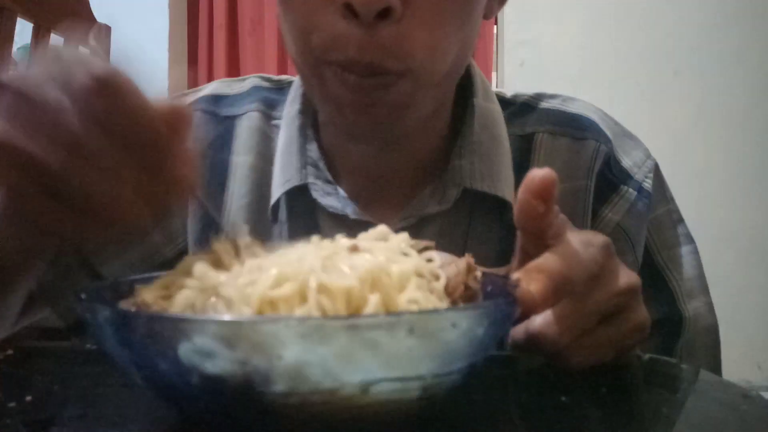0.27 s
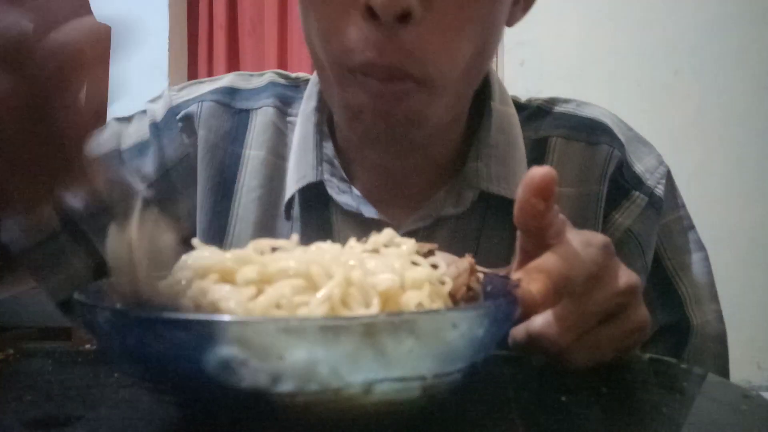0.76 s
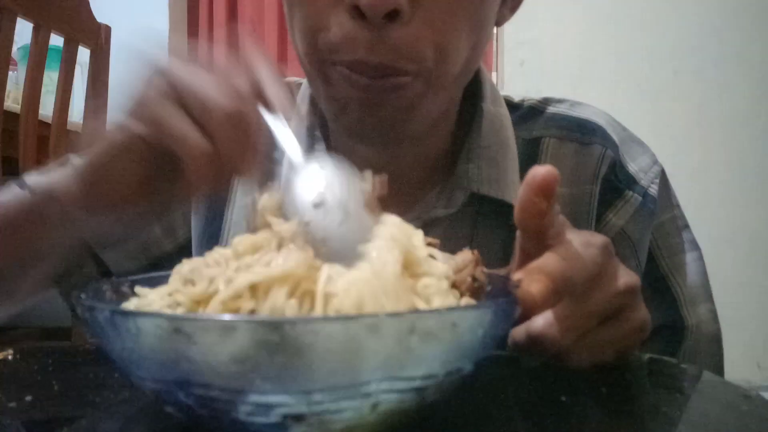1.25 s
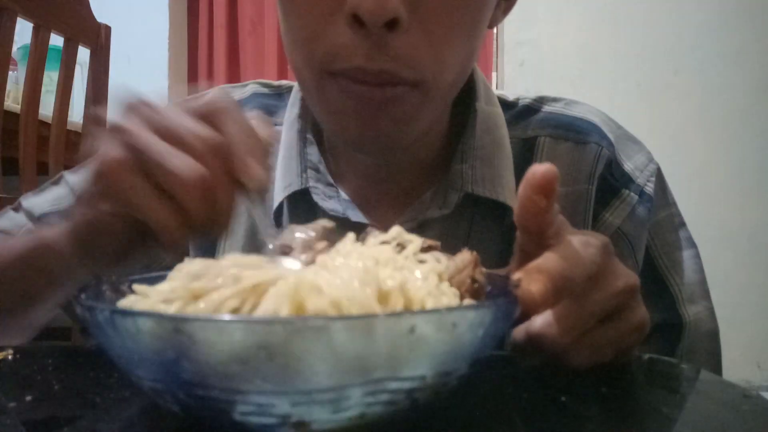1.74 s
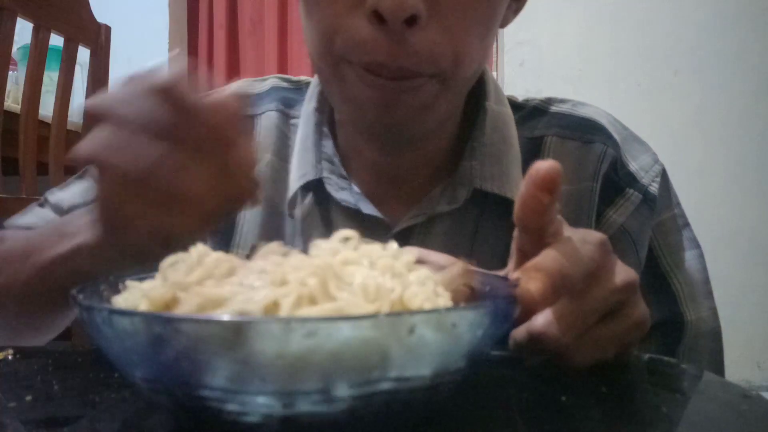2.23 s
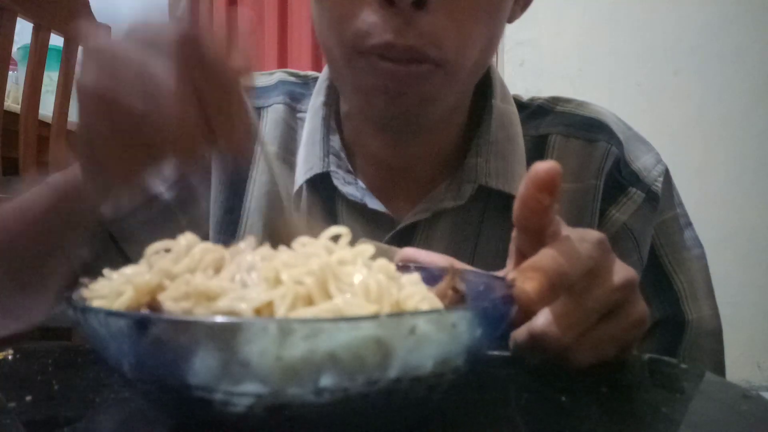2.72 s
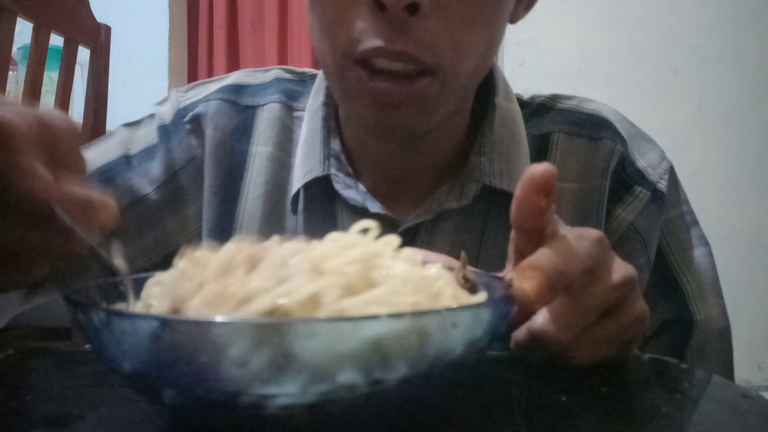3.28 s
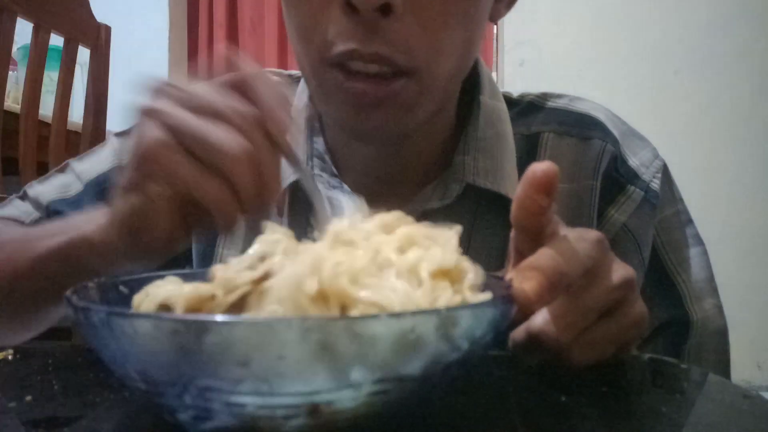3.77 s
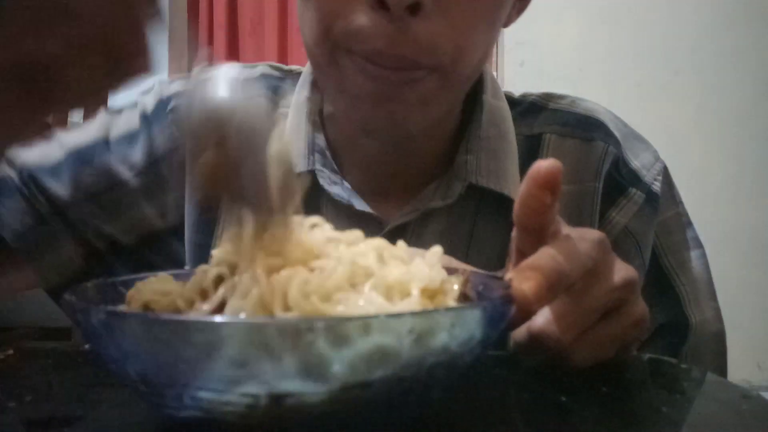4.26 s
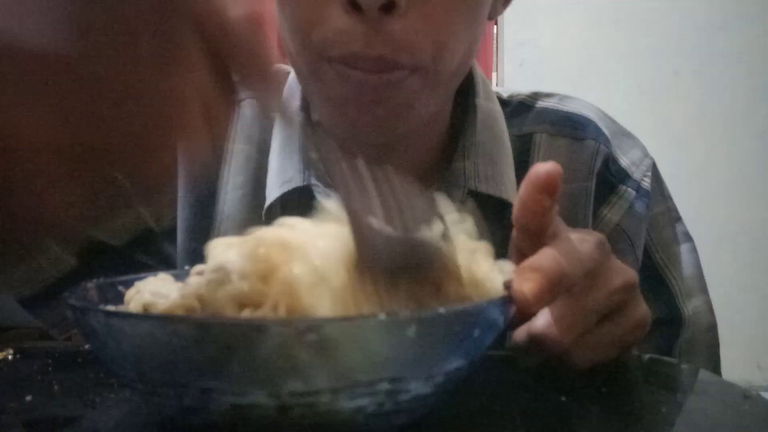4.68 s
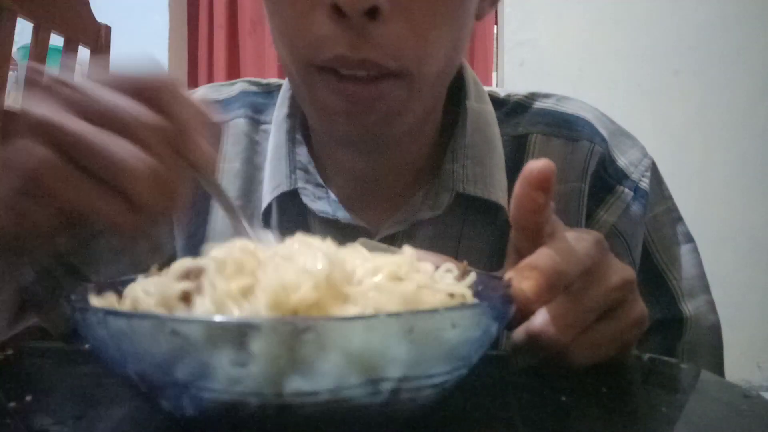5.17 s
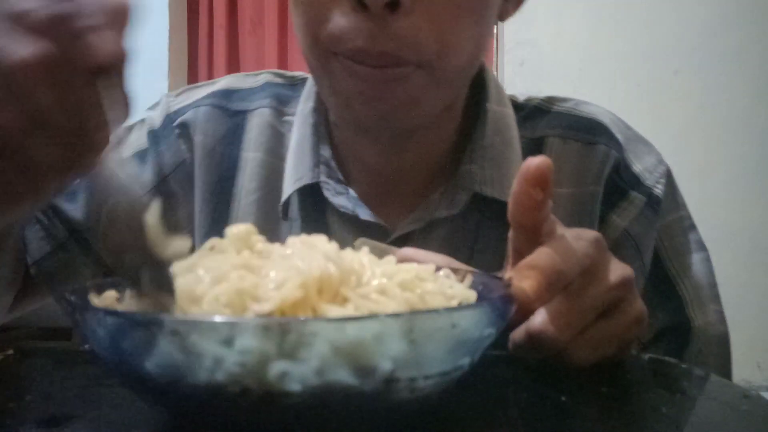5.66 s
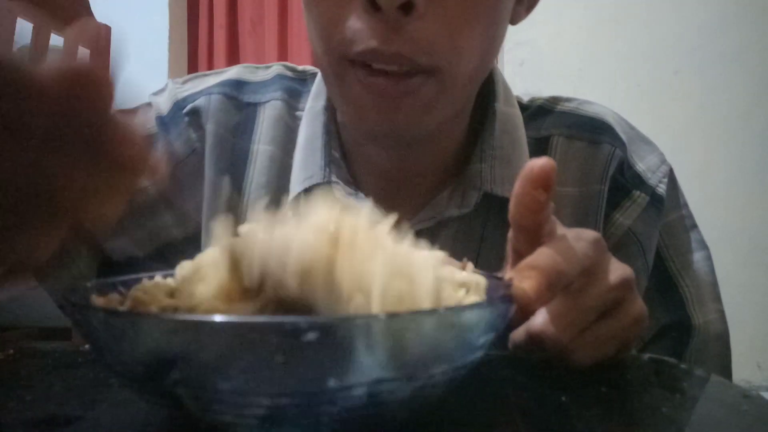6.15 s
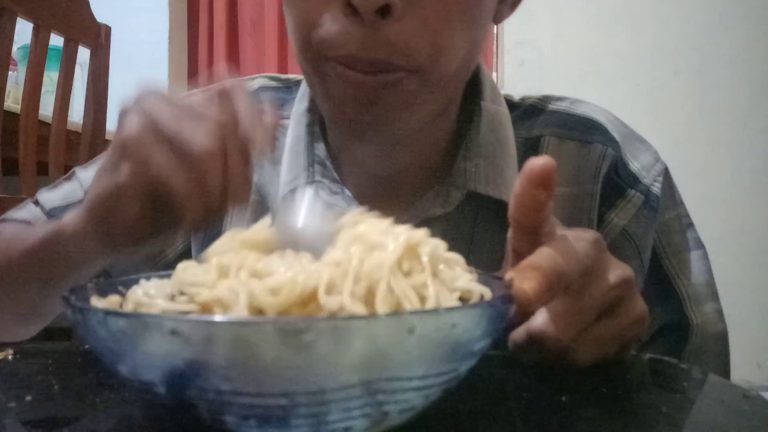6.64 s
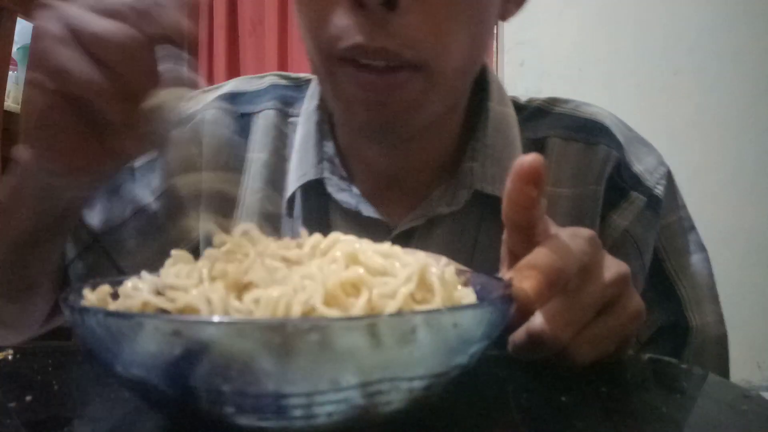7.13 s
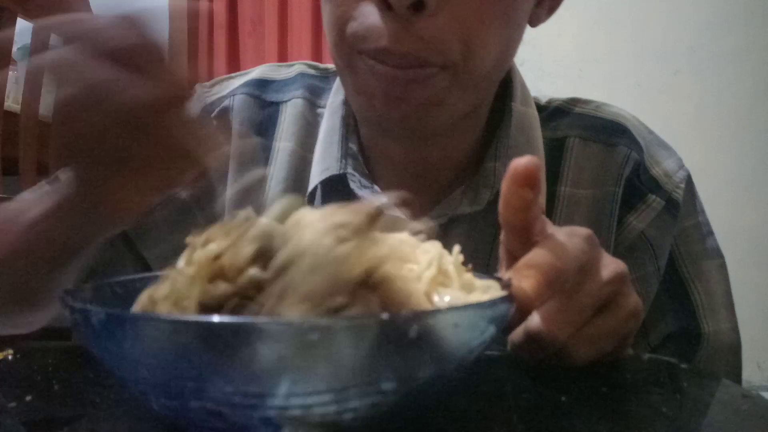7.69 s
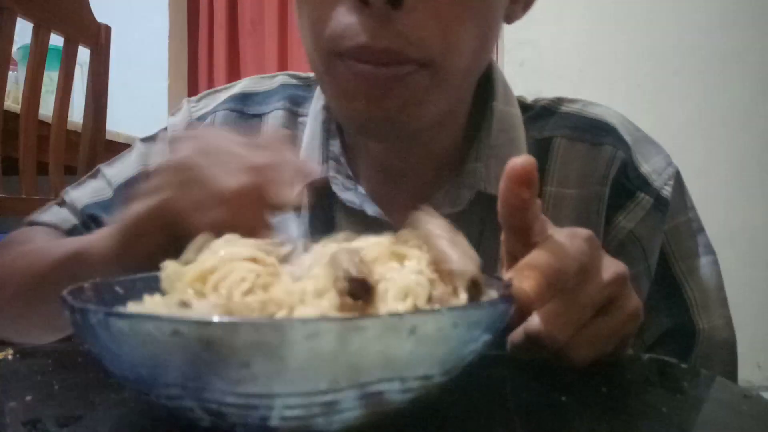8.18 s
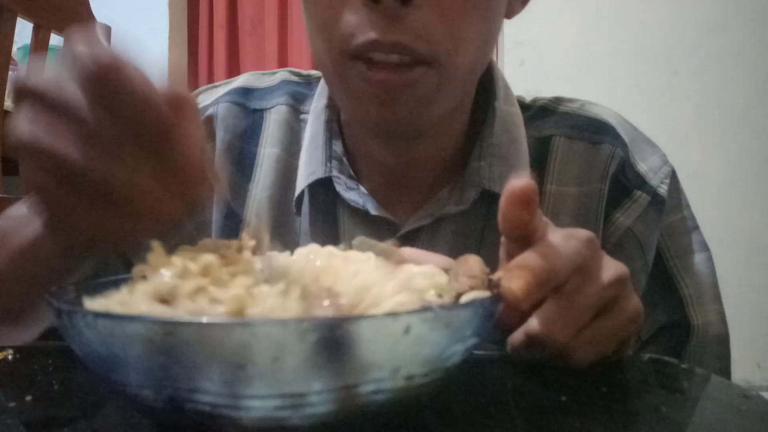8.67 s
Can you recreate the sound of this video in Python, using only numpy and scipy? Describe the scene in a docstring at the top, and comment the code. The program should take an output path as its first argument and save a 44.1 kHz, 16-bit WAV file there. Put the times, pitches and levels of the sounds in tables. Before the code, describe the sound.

A close metal spoon stirs wet noodles in a glass bowl on a table, in a bare, slightly echoing room at night. A bright clink with a low table boom opens the sound; hollow plops follow at 0.3, then a small cluster of clinks at 0.7 and a dull bowl knock at 0.9. Wet plops and rubbing around 1.4 lead to a sharp clink at 1.7. Another dull knock falls at 2.1. At 3.1 a hard clink and quick rasp start a rustling slide that ends in a strong ringing clink at 3.8. Another loud clink comes at 5.2, lighter taps around 6, a clear hit at 6.8, then a bright juddering clatter at 7.3. A clink at 8.2 and wet plops at 8.6 close it. Cricket chirps come in quick groups, mostly from 1 second on, pausing around 4, over a constant faint shrill insect chorus.

```python
"""A metal spoon stirs noodles in a glass bowl on a table, in a bare room at night. Blows ring the glass as
short fading tones with a rough crack, and boom in the table and room. Rubbing, rasping and sliding are tiny
random slips or noise shaped by the bowl; wet noodles plop and tick. Crickets sing as short falling whistles
over a blurred trill, a shrill insect chorus and a quiet background."""
import sys
import numpy as np
from scipy import signal
from scipy.fft import rfft, irfft, next_fast_len
from scipy.io import wavfile
from scipy.ndimage import uniform_filter1d

SR = 44100
rng = np.random.default_rng(int(sys.argv[2]) if len(sys.argv) > 2 else 0)


def transcribe(signal):
    """Save signal, clipped to [-1, 1], as a 16-bit WAV file at the path in sys.argv[1]."""
    frames = np.atleast_2d(signal).T
    limited = np.clip(frames, -1, 1)
    pcm = np.round(limited * 32767).astype(np.int16)
    wavfile.write(sys.argv[1], SR, pcm)


N = 393283
TIME = np.arange(N) / SR
TOP_HZ = 16400


def undb(db):
    """Turn decibels into gain."""
    return 10 ** (np.asarray(db) / 20)


def unit(x):
    """Scale to rms 1."""
    return x / np.sqrt(np.mean(x ** 2))


def held(x, seconds):
    """Scale to the energy of a sound of rms 1 that lasts this long."""
    return x * np.sqrt(seconds * SR / np.sum(x ** 2))


def clock(seconds):
    """Sample times of a short sound."""
    return np.arange(int(seconds * SR)) / SR


def fade(t, t60):
    """Die away smoothly, by 60 dB in t60 seconds."""
    return np.exp(-np.log(1000) * t / t60)


def band(x, lo_hz, hi_hz, order=3):
    """Keep only the pitches between two edges."""
    edges = [lo_hz, min(hi_hz, SR / 2 - 1)]
    return signal.sosfilt(signal.butter(order, edges, "band", fs=SR, output="sos"), x)


def resonate(x, peaks):
    """Side-by-side resonances (f/Hz, half-width of one pass/Hz, level/dB), passed twice for dark valleys."""
    out = 0
    for hz, half_width, db in peaks:
        b, a = signal.iirpeak(hz, hz / (2 * half_width), fs=SR)
        once = signal.lfilter(b, a, x)
        out = out + undb(db) * signal.lfilter(b, a, once)
    return out


def coloured(points):
    """Noise that follows a spectrum of (f/Hz, level/dB per Hz)."""
    hz, db = np.transpose(points)
    size = next_fast_len(N)
    log_hz = np.log(np.fft.rfftfreq(size, 1 / SR) + 1)
    gain = undb(np.interp(log_hz, np.log(hz), db))
    return irfft(rfft(rng.standard_normal(size)) * gain, size)[:N] * np.sqrt(SR / 2)


def walk(rate):
    """Smooth random wander of rms 1, with this many new values a second."""
    k = int(SR / rate)
    steps = np.repeat(rng.standard_normal(N // k + 1), k)
    return unit(uniform_filter1d(steps, k)[:N])


def grains(rate, spread_db):
    """Random tiny clicks, a few much larger than the rest."""
    size = undb(spread_db * np.minimum(rng.exponential(size=N), 5))
    return (rng.random(N) < rate / SR) * size * rng.standard_normal(N)


def waver(x, depth, rate):
    """Bend the pitch of a sound at random."""
    place = np.cumsum(np.exp(depth * walk(rate))) % (N - 1)
    return np.interp(place, np.arange(N), x)


def add(out, s, x):
    """Mix x in at time s."""
    i = min(max(int(s * SR), 0), N)
    out[i:i + len(x)] += x[:N - i]


# quiet background, with a faint hiss up high: f/Hz, level/dB per Hz
QUIET = [(25, -112), (60, -102), (130, -96), (320, -96.5), (500, -105), (1000, -107), (1600, -113),
         (2700, -115), (3450, -108), (4100, -111), (4800, -107), (5600, -110), (7800, -114), (8600, -125),
         (13500, -128), (15200, -119)]
# distant insect chorus: f/Hz, level/dB per Hz before it wanders
CHORUS = [(5700, -125), (6100, -105), (6330, -87), (6480, -91), (6630, -87), (6820, -93.5), (7150, -89),
          (7450, -99), (7800, -113), (8300, -135)]


def night(swell_db=0.84, flicker_db=1.03, rumble_db=0.5):
    """A steady shrill of far insects over a quiet background, whose low rumble comes and goes."""
    quiet = coloured(QUIET)
    rumble = signal.sosfiltfilt(signal.butter(2, 350, fs=SR, output="sos"), quiet)
    shrill = coloured(CHORUS) * undb(swell_db * walk(2.03) + flicker_db * walk(60))
    return shrill + quiet - rumble + rumble * undb(rumble_db * walk(9.9))


# edges of the four ranges called knock, body, ring and sheen: f/Hz
RANGES_HZ = [330, 1300, 3700, 7800, 16000]
# the places on the bowl, in the order of the level columns below
SPOTS = ["side", "rim", "bottom"]
# natural tones of spoon and filled bowl: f/Hz, t60/s, relative level/dB struck on side, on rim, on bottom
MODES_BOWL = [(446, 0.056, -18, -1.5, 7.5), (600, 0.071, -11.5, -2, -2.5), (840, 0.19, -19, -14, -31),
              (1001, 0.076, -12, -2.5, -27), (1250, 0.027, -13.5, -16, -33), (1740, 0.036, -26, -11, -50),
              (2200, 0.011, -3.5, -31, -21), (2640, 0.0067, -14, -0.5, -12), (2950, 0.04, -33, -24, -45),
              (3340, 0.037, -43, -3, -23), (3520, 0.013, -8.5, 5, 3.5), (3900, 0.021, -12, -44, -41),
              (4175, 0.053, -8, 2, -12), (4600, 0.04, -32, -14, -30), (4780, 0.017, -9, -16, -2),
              (5170, 0.051, -9, 0.5, -8.5), (5490, 0.024, -4.5, -19, -36), (5700, 0.031, -22, 4.5, 3),
              (6030, 0.012, -12.5, -15, -14.5), (6220, 0.036, -66, -21, 1), (6440, 0.024, -12, -12, -16),
              (6670, 0.036, 0, -4.5, -12.5), (7460, 0.074, -12, -30, -30), (7070, 0.02, -40, 4, -32),
              (8200, 0.019, -32, -42, -47), (8310, 0.016, -33, -47, -50), (9000, 0.016, -47, -26, -21),
              (9700, 0.021, -34, -29, -50), (10680, 0.042, -43, -44, -59), (11900, 0.037, -37.5, -40, -41),
              (13900, 0.025, -56, -30, -47), (15300, 0.043, -40, -36, -38)]
# ways to strike: spot on the bowl, then the lead over the bowl's strongest tone in the same range of
# the knock (level/dB), the first ring (level/dB) and the second ring (level/dB)
TOUCHES = {"side": ("side", 3.5, 1.5, -0.61), "tip": ("side", 1.6, 10.3, 4.3),
           "rim": ("rim", 4.6, 1.9, 1.7), "bottom": ("bottom", 7.7, 8.6, 1.7)}


def bowl_modes(touch, knock_hz, rings_hz, knock_t60=0.09, ring_t60=0.03):
    """The spot struck sets the bowl's tones; the held spoon adds a knock and two rings that shift with grip."""
    spot, knock_db, *rings_db = TOUCHES[touch]
    hz, t60, *by_spot = np.transpose(MODES_BOWL)
    db = by_spot[SPOTS.index(spot)]

    def strongest(near_hz):
        """Loudest bowl tone in the same range."""
        return db[np.digitize(hz, RANGES_HZ) == np.digitize(near_hz, RANGES_HZ)].max()

    knock = (knock_hz, strongest(knock_hz) + knock_db, knock_t60)
    rings = [(f, strongest(f) + lead_db, ring_t60) for f, lead_db in zip(rings_hz, rings_db)]
    return [*zip(hz, db, t60), knock, *rings]


# crack of the contact against the tones, one for each range: level/dB before crack_db is added
CRACK_DB = [-10.5, -2.5, -16.5, -5]


def clink(modes, levels_db, crack_db, hold_s=0.0065, smear=0.13):
    """Each clink, fading tones and a crack, holds for a few milliseconds, then drops quickly, more so when loud."""
    drop_db, drop_s = -14, 0.0044
    attack_s, soft_attack_s = 0.00049, 0.0026
    detune, scatter_db = 0.0045, 2.5  # small chance changes from blow to blow
    t = clock(.06)
    loud = np.interp(max(levels_db), [-54, -25], [0, 1])
    hz, db, t60 = np.transpose(modes)[:, :, None]
    pitch = hz * (1 + detune * rng.standard_normal(hz.shape))
    db = db + scatter_db * rng.standard_normal(hz.shape)
    rings = undb(db) * fade(t, t60) * np.sin(2 * np.pi * (pitch * t + rng.random(hz.shape)))
    shape = undb(loud * np.interp(t, [hold_s, hold_s + drop_s], [0, drop_db]))
    # noodles cushion a light touch, so it starts softly
    shape *= np.minimum(t / (attack_s + soft_attack_s * (1 - loud) ** 2), 1)
    out = 0
    for lo, hi, level_db, noise_db in zip(RANGES_HZ, RANGES_HZ[1:], levels_db, CRACK_DB):
        inside = (lo <= hz[:, 0]) & (hz[:, 0] < hi)
        ring = rings[inside].sum(axis=0)
        # the rough contact smears each tone into a broad rattle
        rattle = 0
        for f, d in zip(hz[inside, 0], db[inside, 0]):
            rattle = rattle + resonate(rng.standard_normal(len(t)), [(f, smear * f, d)]) / np.sqrt(f)
        crack = unit(fade(t, 0.026) * band(rattle, lo, hi, order=4))
        part = ring + undb(noise_db + crack_db) * (np.std(ring) + 1e-9) * crack
        out = out + undb(level_db) * held(part * shape, .01)
    return out


# low tones of table and room: f/Hz, relative level/dB, t60/s
MODES_ROOM = [(60.5, -18, 0.59), (80, -7, 0.47), (102.6, -20, 1.26), (116.4, -13, 1.64), (152.5, 1, 0.88),
              (178.4, 2, 0.48), (194.5, 1, 0.67), (228, -7.5, 0.29), (270, -1, 0.57), (320.4, -6.5, 1.31),
              (439, -4, 0.45), (582, -12, 0.89), (635, -7.5, 0.43), (1048, -11.5, 0.42)]


def thump(diffuse_db=-2, diffuse_t60=0.75, build_s=0.001, sub_db=-12, scatter_db=2):
    """A blow passes through the table and sets the low room tones booming."""
    t = clock(0.81)
    hz, db, t60 = np.transpose(MODES_ROOM)[:, :, None]
    hz = hz * (1 + 0.00712 * rng.standard_normal(hz.shape))
    db = db + scatter_db * rng.standard_normal(hz.shape)
    tones = undb(db) * fade(t, t60) * np.sin(2 * np.pi * (hz * t + rng.random(hz.shape)))
    noise = rng.standard_normal(len(t))
    diffuse = unit(band(noise, 180, 356, order=2)) + undb(sub_db) * unit(band(noise, 29.2, 110, order=1))
    boom = np.sum(tones, axis=0) + undb(diffuse_db) * diffuse * fade(t, diffuse_t60)
    return held(boom * (1 - np.exp(-t / build_s)), 0.13)


# spoon blows: t/s, way of striking, knock f/Hz, first ring f/Hz, second ring f/Hz, table thump level/dB,
# then knock, body, ring and sheen level/dB before the mix
BLOWS = [(.02, "side", 954, 4110, 2130, -38.5, -29, -30.5, -24, -65),
         (.663, "bottom", 635, 3400, 6030, -49, -40.5, -41, -39.5, -47.5),
         (0.741, "side", 422, 2400, 3800, -63, -50, -58, -52.5, -85),
         (0.797, "bottom", 527, 5490, 2580, -52, -43, -45, -39.5, -62),
         (0.825, "side", 910, 2270, 3060, -78, -49, -50, -59, -80),
         (1.671, "side", 950, 6610, 4864, -41.5, -33, -32, -19, -42),
         (1.832, "side", 1000, 3180, 8250, -72, -50.5, -56, -60, -72),
         (1.921, "side", 490, 4600, 1500, -50, -55.5, -78, -57, -81),
         (2.633, "side", 573, 3520, 4400, -59, -53.5, -49.5, -51, -80),
         (2.813, "side", 417, 3270, 5000, -86, -74, -60, -60, -86),
         (2.835, "tip", 417, 3210, 1850, -76, -75, -55, -62, -86),
         (3.137, "bottom", 446, 6160, 1750, -40.5, -31.5, -33.5, -27, -49),
         (3.208, "tip", 403, 4175, 6500, -63, -60, -52, -34.5, -57),
         (3.215, "tip", 404, 4175, 6500, -46.5, -62, -47, -37.5, -60),
         (3.615, "side", 800, 2950, 4480, -58.5, -47.5, -44.5, -43, -65),
         (3.718, "side", 900, 4500, 3470, -76, -67, -52, -52.5, -87.5),
         (3.8394, "tip", 600, 5590, 5300, -38.5, -27, -29, -19.5, -41.5),
         (4.487, "bottom", 554, 3300, 5700, -58.5, -64, -42, -44.5, -61),
         (4.887, "side", 1250, 3900, 1350, -68, -69, -72, -56, -82),
         (5.1856, "side", 597, 4175, 5820, -37, -30, -30, -21, -45),
         (5.821, "bottom", 563, 3400, 1460, -54.5, -42.5, -49, -48.5, -59),
         (5.946, "rim", 400, 5900, 2840, -53, -57, -44, -40, -66),
         (5.967, "rim", 1000, 2720, 4200, -61.5, -47.5, -41, -46, -66),
         (6.076, "side", 1000, 2950, 1900, -86, -55, -57, -58, -85),
         (6.141, "side", 1303, 2950, 1960, -83, -64, -56.5, -63, -82),
         (6.761, "side", 990, 6620, 4760, -44.5, -34, -32, -21.5, -49),
         (6.873, "rim", 410, 2640, 4800, -60, -46.5, -48.5, -51, -75),
         (7.056, "side", 1000, 2640, 4860, -94, -78, -52.5, -60, -86),
         (7.082, "rim", 1090, 3340, 4900, -90, -65, -48.5, -57, -87),
         (7.276, "rim", 955, 6850, 3400, -46, -28.5, -24.5, -23.5, -36),
         (7.334, "tip", 500, 3400, 4170, -51, -45, -38, -40, -56),
         (7.347, "tip", 1000, 1780, 3270, -49, -42, -45, -43, -59),
         (7.483, "bottom", 445, 2200, 3900, -56.5, -49.5, -64, -53, -78),
         (8.189, "side", 1000, 4920, 4230, -44, -35.5, -32, -19, -44),
         (8.507, "side", 915, 3550, 2730, -83, -67, -67, -57, -82),
         (8.855, "side", 1026, 6670, 3900, -83, -63, -53.5, -50, -76),
         (8.877, "side", 1030, 3450, 3940, -92, -65, -60, -61, -82)]
# the bowl tips and knocks dully on the table: t/s, table thump level/dB,
# then knock, body, ring and sheen level/dB before the mix
KNOCKS = [(.902, -52.5, -38.5, -49.5, -59, -86), (2.148, -46.5, -35, -43, -64, -69)]
# natural tones of the bowl's foot on the table: f/Hz, relative level/dB, t60/s
MODES_FOOT = [(440, 8.5, 0.017), (785, 0.5, 0.069), (867, -4.5, 0.035), (1296, -6.5, 0.051),
              (1630, -10, 0.065), (1940, -14, 0.1), (2280, -11, 0.042), (2460, -7, 0.045),
              (3080, -16, 0.033), (3700, -18, .03), (8500, -35, .02)]
# the spoon springs clear and its handle hums on: t/s, f/Hz, level/dB, t60/s
HUMS = [(.902, 3430, -76, 1.9), (2.148, 3520, -71.5, 1.5), (2.835, 3100, -65, 0.35),
        (3.84, 553, -44.5, 1.05), (5.186, 620, -59.5, 1.4)]


def blows(clink_db=-1.5, scattered_db=-1):
    """Every blow or knock gives a clink and a thump; after some the handle hums."""
    clinks, scattered, thumps = np.zeros((3, N))
    hits = [(s, MODES_FOOT, *levels) for s, *levels in KNOCKS]
    for s, touch, knock_hz, first_hz, second_hz, *levels in BLOWS:
        hits.append((s, bowl_modes(touch, knock_hz, (first_hz, second_hz)), *levels))
    for s, modes, table_db, *levels_db in hits:
        add(clinks, s, clink(modes, levels_db, crack_db=-2.0))
        # the walls hear the bowl from all sides, which evens out its peaks
        add(scattered, s, clink(modes, levels_db, crack_db=17.5, hold_s=0.0033, smear=0.46))
        add(thumps, s, undb(table_db) * thump())
    t = clock(0.98)
    for s, hz, db, t60 in HUMS:
        add(thumps, s, undb(db) * fade(t, t60) * np.sin(2 * np.pi * hz * t))
    return undb(clink_db) * clinks, undb(scattered_db) * scattered, thumps


# echo tail of the room: f/Hz, level/dB against the sound sent to the walls, t60/s
ROOM = [(248, 2, 0.15), (530, -2.5, 0.55), (1000, -4.5, 0.57), (1370, -11, 0.43), (1900, -4.5, 0.4),
        (4000, -11, 0.41), (6400, -10.5, 0.44), (10000, -12.5, 0.31), (14900, -11, 0.18)]


def room(x, gap_s=0.0019, build_s=0.0035):
    """Hard walls return a blurred tail whose strength and length depend on pitch."""
    t = clock(1.0)
    hz, db, t60 = np.transpose(ROOM)
    edges = np.geomspace(200, TOP_HZ, num=14)
    build = np.clip((t - gap_s) / build_s, 0, 1)
    tail = 0
    for lo, hi in zip(edges, edges[1:]):
        middle = np.log(lo * hi) / 2
        gain_db = np.interp(middle, np.log(hz), db)
        decay = np.interp(middle, np.log(hz), t60)
        part = band(rng.standard_normal(len(t)), lo, hi) * fade(t, decay) * build
        tail = tail + undb(gain_db) * part * np.sqrt(2 * (hi - lo) / SR / np.sum(part ** 2))
    return signal.fftconvolve(x, tail)[:N]


# air pockets plop among the noodles: t/s, f/Hz before scatter, typical peak level/dB, number of pops
PLOPS = [(.339, 440, -42.5, 2), (.352, 710, -48.5, 2), (1.369, 930, -45, 1), (1.421, 705, -46.5, 1),
         (1.429, 623, -45.5, 3), (1.486, 860, -67, 1), (1.512, 680, -48, 1), (1.54, 635, -48.5, 3),
         (1.634, 940, -55, 3), (2.275, 465, -53, 2), (2.9, 700, -56, 1), (2.962, 667, -52, 2),
         (2.977, 600, -47.5, 1), (3.005, 750, -49.5, 2), (5.395, 520, -44.5, 2), (6.104, 1000, -48.5, 1),
         (8.073, 1000, -52.5, 1), (8.088, 920, -48.5, 2), (8.122, 930, -49, 3), (8.151, 905, -48, 1),
         (8.164, 1010, -57, 2), (8.638, 960, -48, 1), (8.657, 940, -42.5, 2), (8.672, 1150, -45, 1),
         (8.69, 900, -49, 1), (8.699, 1200, -46, 1)]


def plops(t60=0.02, attack_s=0.00097, gap_s=0.0076):
    """Pockets of air open among the strands: one pop or a quick few, each two hollow notes and a wet tick."""
    pitch_scatter, gap_scatter = 0.11, 0.118
    upper, upper_db, wet_db = 1.53, -5, -23  # the second note's pitch ratio and level, the tick's level
    out, t = np.zeros(N), clock(0.033)
    shape = fade(t, t60) * np.minimum(t / attack_s, 1)
    for s, hz, db, count in PLOPS:
        for k in range(count):
            pitch, late, size_db = rng.standard_normal(3)
            phase = 2 * np.pi * hz * np.exp(pitch_scatter * pitch) * t
            tick = undb(wet_db) * unit(band(rng.standard_normal(len(t)), 500, 2600, order=2))
            pop = shape * (np.sin(phase) + undb(upper_db) * np.sin(upper * phase) + tick)
            start = s + k * gap_s * (1 + gap_scatter * late)
            add(out, start, undb(db + size_db) * pop / np.abs(pop).max())
    return out


# cricket chirps: t/s, near or far singer, number of wing strokes, level/dB before rasp and mix
CHIRPS = [(0.999, "far", 3, -65), (1.073, "near", 3, -51.5), (1.296, "near", 3, -51),
          (1.516, "near", 3, -51), (1.735, "near", 3, -52), (1.954, "near", 3, -50), (2.161, "far", 3, -58),
          (2.38, "far", 4, -53), (2.634, "near", 3, -56), (2.83, "far", 4, -53), (3.049, "far", 3, -53),
          (3.29, "far", 3, -59), (3.499, "far", 3, -52), (4.445, "near", 3, -48.5), (4.667, "near", 3, -50),
          (4.891, "near", 3, -47.5), (5.114, "near", 3, -51), (5.33, "far", 3, -59),
          (5.491, "far", 4, -58.5), (5.731, "far", 3, -55.5), (5.865, "near", 3, -54),
          (6.044, "near", 3, -58), (6.274, "near", 4, -56.5), (6.48, "near", 4, -53.5),
          (6.8, "far", 3, -68), (7.019, "near", 3, -51), (7.24, "far", 3, -47), (7.362, "near", 3, -49),
          (7.494, "near", 6, -54), (7.714, "near", 6, -52), (8.004, "near", 3, -52.5),
          (8.22, "near", 3, -58), (8.447, "near", 3, -51), (8.701, "near", 3, -54), (8.82, "far", 2, -54)]


def crickets(stroke_s=0.0192, spacing_s=.034, start_hz=5230, end_hz=4250, first_db=-3, rasp=0.89, detune=0.0077):
    """Each wing stroke is a short, raspy whistle that falls as the wing slows; gives near and far singer."""
    songs, t = {"near": np.zeros(N), "far": np.zeros(N)}, clock(stroke_s)
    glide = np.linspace(start_hz, end_hz, len(t))
    shape = signal.windows.tukey(len(t), .7)
    for start, singer, strokes, db in CHIRPS:
        for k in range(strokes):
            hz = glide * (1 + detune * rng.standard_normal())
            size = undb(db + first_db * (k == 0))  # the first stroke is softer
            whistle = np.sin(2 * np.pi * np.cumsum(hz) / SR)
            add(songs[singer], start + k * spacing_s, size * shape * whistle)
    # the teeth of the file catch unevenly
    return [song * (1 + rasp * walk(400)) for song in songs.values()]


# many far crickets blur into one band: f/Hz, relative level/dB per Hz
TRILL = [(3900, -20), (4300, 1), (4500, -2), (4950, 4.5), (5150, 5), (5400, -32.5)]
# they sing in spells: start t/s, end t/s, level/dB before flutter
SPELLS = [(1.02, 2.3, -65.5), (2.35, 3.797, -67.5), (4.45, 5.2, -70), (5.75, 7.15, -68.5),
          (7.35, 8.9, -64.5)]


def trill(fade_s=0.045, flutter_db=2.5):
    """Far crickets overlap in a soft, grainy trill of noise that fades in and out."""
    gain = 0
    for start, end, db in SPELLS:
        corners = [start - fade_s, start + fade_s, end, end + fade_s]
        gain = gain + undb(db) * np.interp(TIME, corners, [0, 1, 1, 0])
    return gain * unit(coloured(TRILL)) * undb(flutter_db * walk(55))


# wet noodles parting: t/s, peak level/dB, f/Hz (upper edge of the snap's band)
SMACKS = [(1.095, -57, 8800), (1.813, -49, 11900), (1.822, -47, 14700), (4.51, -52, 9150),
          (7.696, -52, 6000), (7.756, -54, 8750), (7.866, -42.5, 5850)]


def smacks(t60=0.0043):
    """Films of sauce snap between the strands, each a tiny burst of noise."""
    out, t = np.zeros(N), clock(.02)
    for s, db, hz in SMACKS:
        snap = band(rng.standard_normal(len(t)) * fade(t, t60), 0.96 * hz, 1.0 * hz, order=1)
        add(out, s, undb(db) * snap / np.abs(snap).max())
    return out


def stroke(start, length, attack_s=0.023, release_s=0.08):
    """The spoon digs in, drags on and lifts out."""
    corners = [-attack_s / 2, attack_s / 2, length, length + release_s]
    return np.interp(TIME - start, corners, [0, 1, 1, 0])


# strokes of the spoon through the noodles: start t/s, length t/s,
# table rumble, rubbing and scratch level/dB before drag and mix
STROKES = [(1.4, 0.032, -73, -61, -72), (1.532, 0.23, -69, -61, -78), (1.783, 0.055, -71, -58, -59),
           (2.91, 0.22, -85, -60, -90), (3.053, 0.07, -69, -67, -62), (3.297, 0.17, -58, -63.5, -69),
           (3.608, 0.45, -57.5, -59, -61), (4.485, 0.26, -57, -66, -65),
           (4.918, 0.019, -61.5, -65.5, -58.5), (5.108, 0.09, -76, -59.5, -63), (6, 0.21, -59, -75, -64),
           (6.506, 0.22, -60, -65, -67), (6.929, 0.076, -69, -70, -56), (7.693, 0.28, -58, -73, -74.5),
           (8.056, 0.16, -77, -59, -61.5), (8.22, 0.061, -57, -62, -48), (8.47, 0.021, -62, -67, -71),
           (8.596, .13, -70, -61, -66.5)]
# the bowl under a sliding spoon, rubbed and scratched: f/Hz, half-width of one pass/Hz, relative level/dB
RUB = [(620, 170, -4), (940, 147, 5.5), (1270, 93, -7)]
SCRATCH = [(1900, 1000, -5.5), (2435, 150, 1), (3400, 310, 5.5), (5540, 390, 8.5), (8600, 3700, -45)]


def stirring(rumble_db=-6, rub_db=-5.5, scratch_db=-1, wet_db=-14):
    """The spoon drags noodles over glass: dense tiny slips into the bowl, and a fine wet crackle."""
    drag_db, drag_rate = 4.5, 24.1  # strands catch and let go: depth, and new values a second
    gains = sum(np.outer(undb(levels_db), stroke(start, length)) for start, length, *levels_db in STROKES)
    rumble_gain, rub_gain, scratch_gain = gains * undb(drag_db * walk(drag_rate))
    rumble = unit(band(grains(600, 0.47), 122.0, 146.5, order=2))
    # air pockets among the strands change size, so the hollow rub bends in pitch
    rub = unit(waver(resonate(grains(900, 2.8), RUB), depth=0.028, rate=25))
    scratch = unit(resonate(grains(2000, 2.7), SCRATCH))
    crackle = unit(band(grains(1500, 6.3), 3530, 7100, order=2))
    out = undb(rumble_db) * rumble_gain * rumble + undb(rub_db) * rub_gain * rub
    return out + scratch_gain * (undb(scratch_db) * scratch + undb(wet_db) * crackle)


# the spoon sticks and slips: start t/s, end t/s, typical slips per s, ring f/Hz,
# level/dB at the start, level/dB at the end
JUDDERS = [(3.151, 3.179, 280, 6400, -28, -59), (3.195, 3.217, 306, 4175, -49, -42.5),
           (7.295, 7.347, 263, 500, -41, -37.5)]
# the spoon's edge chattering on the glass: f/Hz, half-width of one pass/Hz, relative level/dB
CHATTER = [(527, 31, 7), (980, 105, 8.5), (1794, 29, 1.5), (2640, 150, -36), (3550, 230, 4), (4520, 68, -6),
           (5700, 320, -17), (6400, 180, 4)]


def judder(scatter=0.22, ring_half_width_hz=180, ring_db=5):
    """Quick uneven slips of the spoon's edge rasp on the glass and keep one tone ringing."""
    slips = np.zeros(N)
    for start, end, rate, ring_hz, start_db, end_db in JUDDERS:
        t = clock(end - start)
        turns = np.cumsum(rate * np.exp(scatter * walk(200)[:len(t)])) / SR
        pulses = np.diff(np.floor(turns), prepend=0)  # one click for each whole turn
        rasp = resonate(pulses, CHATTER + [(ring_hz, ring_half_width_hz, ring_db)])
        add(slips, start, unit(rasp) * undb(np.linspace(start_db, end_db, len(t))))
    return slips


# the back of the spoon slides over the wet glass: start t/s, end t/s,
# level/dB at the start, level/dB at the end, both before flutter
SLIDES = [(3.208, 3.602, -54, -60), (3.61, 3.833, -83, -54)]
# hiss of that slide: f/Hz, relative level/dB per Hz
SLIDE_HISS = [(300, -25), (700, -5), (1030, 12), (1400, -14), (1850, -6), (2600, -23), (3500, 4),
              (4200, -1), (5500, 8.5), (7000, 12), (8000, -8), (9300, -11), (11000, -32), (16000, -25)]


def slides(flutter_db=2.5):
    """Sauce lets the spoon glide, with an unbroken rustle of shaped noise."""
    gain = 0
    for start, end, start_db, end_db in SLIDES:
        level_db = np.interp(TIME, [start, end], [start_db, end_db])
        gain = gain + stroke(start, end - start) * undb(level_db)
    return gain * unit(coloured(SLIDE_HISS)) * undb(flutter_db * walk(70))


def scene(cricket_direct_db=-3, cricket_room_db=7.0, far_room_db=7):
    """The bowl is close; one cricket is heard partly by way of the walls, a farther one only that way."""
    clinks, scattered, thumps = blows()
    friction = stirring() + judder() + slides() + plops() + smacks()
    near, far = crickets()
    walls = room(scattered + friction + undb(cricket_room_db) * near + undb(far_room_db) * far)
    direct = clinks + thumps + friction + undb(cricket_direct_db) * near
    return (direct + walls + trill() + night())[None]


def record(dry):
    """Steep low-pass: nothing is heard above the top pitch."""
    return signal.sosfilt(signal.ellip(8, .2, 70, TOP_HZ, fs=SR, output="sos"), dry)


dry = scene()
out = record(dry)
transcribe(out)
```